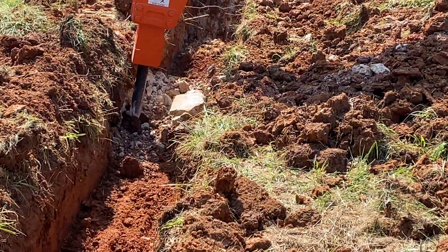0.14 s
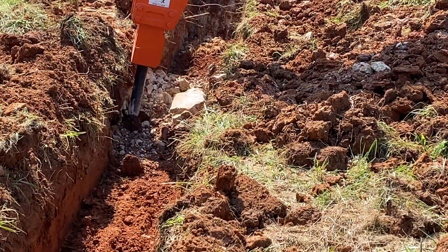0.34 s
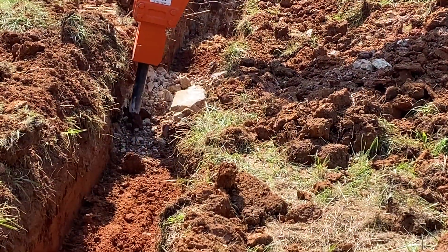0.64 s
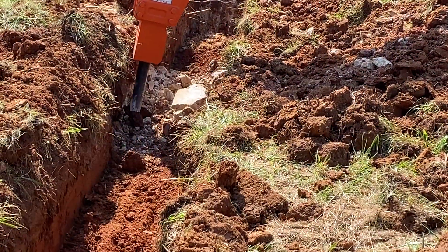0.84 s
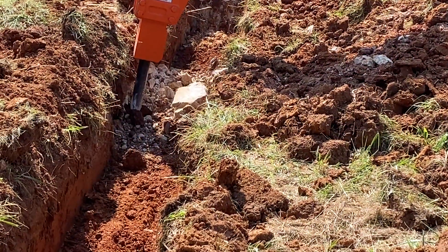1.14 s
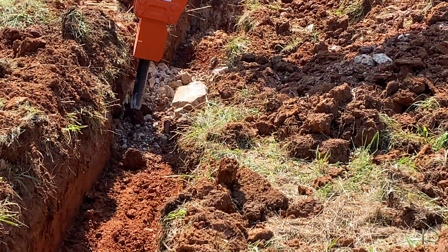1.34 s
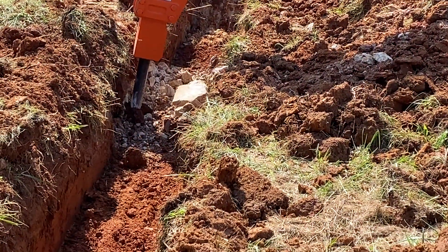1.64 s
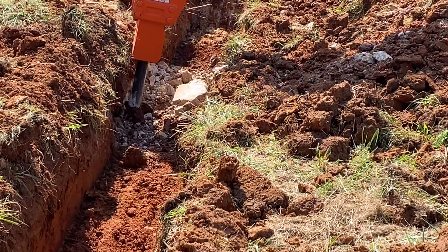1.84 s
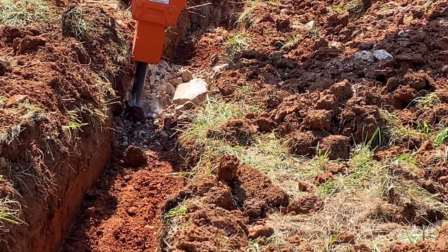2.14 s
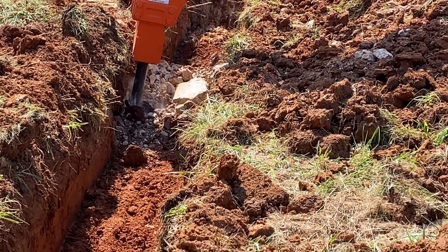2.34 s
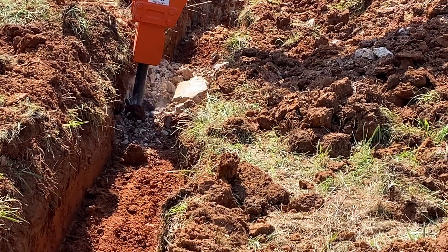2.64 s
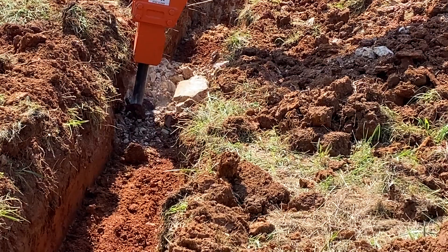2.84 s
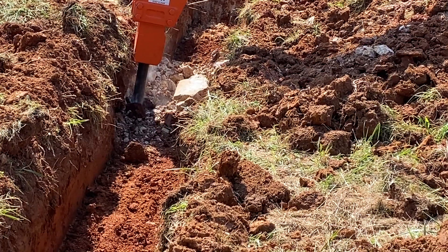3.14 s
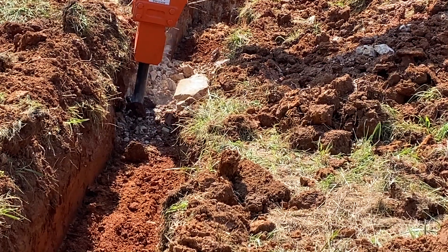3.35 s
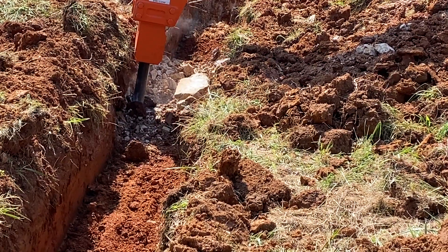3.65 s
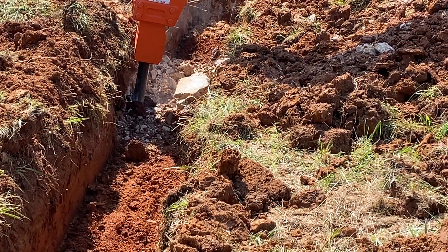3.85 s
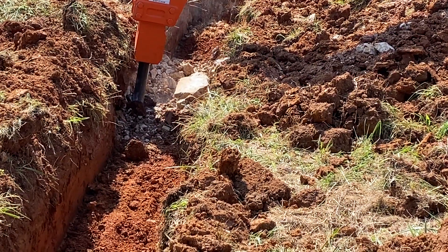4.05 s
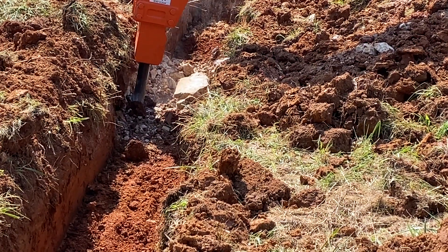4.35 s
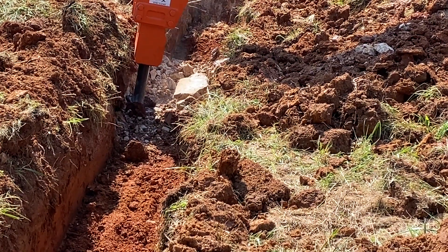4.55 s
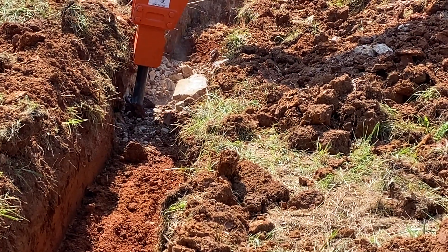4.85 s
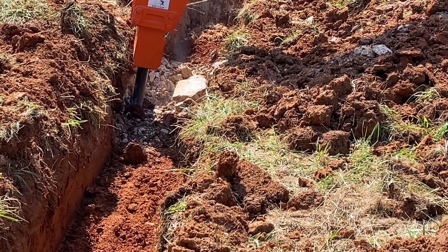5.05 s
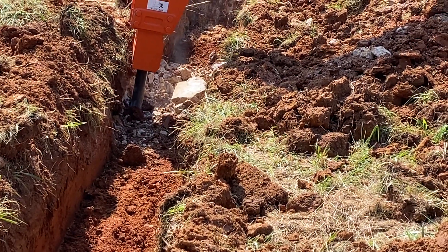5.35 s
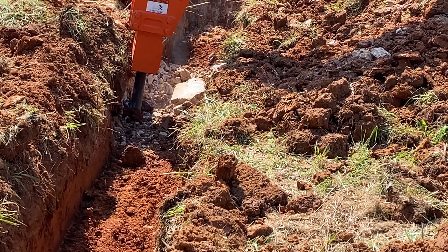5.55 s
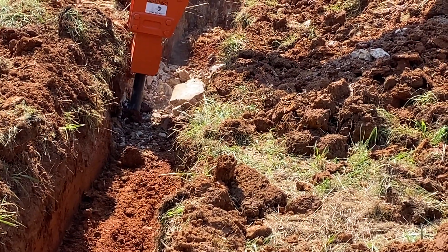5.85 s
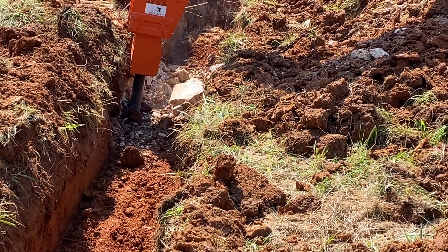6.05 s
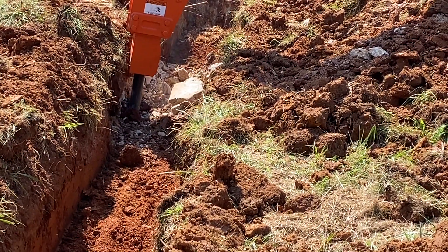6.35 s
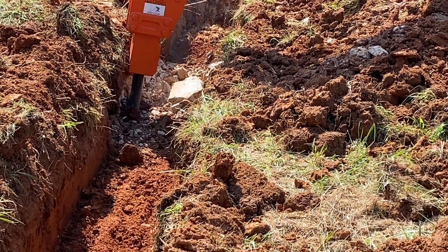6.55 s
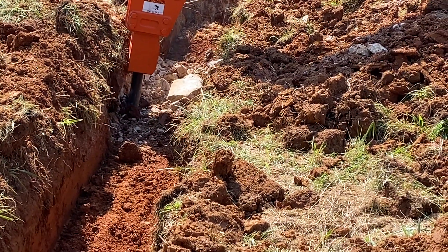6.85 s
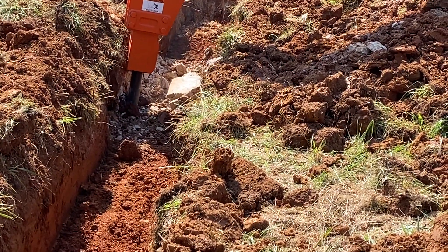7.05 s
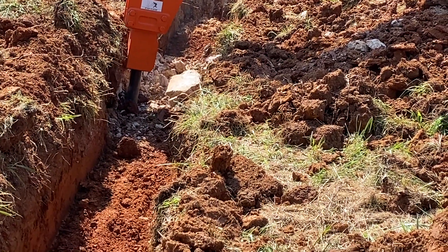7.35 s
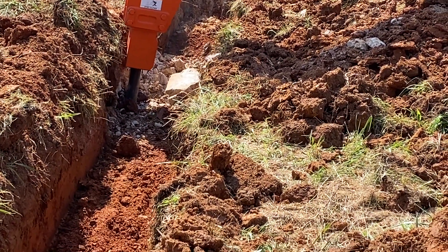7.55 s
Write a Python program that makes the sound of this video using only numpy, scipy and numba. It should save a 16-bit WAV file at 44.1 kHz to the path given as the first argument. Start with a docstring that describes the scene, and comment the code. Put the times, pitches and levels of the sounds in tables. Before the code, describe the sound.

A low diesel drone runs for nearly two seconds, with a light metal clank and rushing oil as the breaker is pressed down. A crunch starts relentless hydraulic hammering: sharp cracks, short steely clangs, small rebounds and rattling chips, first slightly uneven, later faster and even. Short scatter comes from the dirt banks; a handheld recorder's gain control pushes the engine beneath the loud blows until the end.

```python
"""An excavator's diesel and fan run beside a trench, then the chisel knocks in its bushing and oil whistles.
Pushed home, the chisel crunches; the hydraulic hammer pounds the rock, six blows a second, then eight.
Engine and pump are firing-rate tones and coloured noise. Each blow is a noise crack plus decaying steel
modes, with rebounds, rattling grit and scatter off the trench banks. The recorder's gain control pushes
the engine down once the blows begin."""
import sys
import numpy as np
from scipy import signal
from scipy.fft import rfft, irfft, next_fast_len
from scipy.io import wavfile
from scipy.ndimage import uniform_filter1d, minimum_filter1d
from numba import njit

SR = 44100
rng = np.random.default_rng(int(sys.argv[2]) if len(sys.argv) > 2 else 0)


def master(y):
    """Save y as 16-bit WAV."""
    cut = np.clip(np.atleast_2d(y).T, -1, 1)
    pcm = np.round(cut * 32767)  # scale
    wavfile.write(sys.argv[1], SR, pcm.astype(np.int16))


N = 340011
TIME = np.arange(N) / SR
AGE = TIME[:12000]  # seconds since a blow


def undb(db):
    """Decibels to gain."""
    return 10 ** (np.asarray(db) / 20)


def curves(table, times=TIME):
    """The columns of a table, joined by straight lines in time."""
    s, *columns = np.transpose(table)
    return [np.interp(times, s, column) for column in columns]


def at_hz(hz, points):
    """Read (frequency [Hz], value) points on a log-frequency axis."""
    f, value = np.transpose(points)
    return np.interp(np.log(np.maximum(hz, 1)), np.log(f), value)


def colour(white, points):
    """Give unit white noise a spectrum in dB per Hz."""
    size = next_fast_len(white.shape[-1])
    gain = undb(at_hz(np.fft.rfftfreq(size, 1 / SR), points)) * np.sqrt(SR / 2)
    return irfft(rfft(white, size) * gain, size)[..., :white.shape[-1]]


def band_noise(hz, width_hz):
    """Noise through the same resonance twice, rms 1; width_hz is that of one pass."""
    b, a = signal.iirpeak(hz, hz / width_hz, SR)
    once = signal.lfilter(b, a, rng.standard_normal(N))
    twice = signal.lfilter(b, a, once)
    return twice / twice.std()


def walk(rate):
    """Random wander with a spread near 1, joined by straight lines between `rate` points a second."""
    return np.interp(TIME * rate, np.arange(1000), rng.standard_normal(1000))


def ramp(start_s, length_s):
    """An even rise from 0 to 1."""
    return np.clip((TIME - start_s) / length_s, 0, 1)


def fade(t60):
    """Exponential decay after a blow, 60 dB down at t60 seconds."""
    return np.exp(-np.log(1000) * AGE / t60)


def add(track, s, sound):
    """Mix a sound into a track at a time."""
    start = min(int(s * SR), N)
    track[start:start + len(sound)] += sound[:N - start]


# Fan and exhaust noise from the sides: (frequency [Hz], level [dB per Hz])
FAN_SPECTRUM = [(60, -82), (140, -55), (200, -58), (260, -69), (350, -67), (430, -80), (700, -64),
                (1050, -75), (1430, -63.5), (2100, -83.5), (3000, -112)]


def fan():
    """Cooling air and exhaust spread to the sides: one noise, in opposite polarity left and right."""
    return colour(rng.standard_normal(N), FAN_SPECTRUM) * np.array([[1], [-1]])


# The hydraulic load builds as the hammer is pressed onto the rock
PRESS_FROM_S, PRESS_S, IDLE_LOAD = 1.34, 0.51, 0.1


def pump_load():
    """Hydraulic load 0-1: light at first, full once the hammer leans on the rock."""
    return IDLE_LOAD + (1 - IDLE_LOAD) * ramp(PRESS_FROM_S, PRESS_S)


# The firing rate flares briefly as the hammer changes stroke
FIRING_HZ, FLARE_HZ, FLARE_AT_S, FLARE_S = 67.36, 1.77, 4.5, 0.0468
# Exhaust and pump tones, before the engine's level:
# (multiple of firing rate, level [dB], extra level at full load [dB])
ENGINE_TONES = [(1, -18, -5), (2, -23.5, 1), (3, -34.5, -17), (4.25, -42, -3), (5.5, -47.5, 11),
                (6, -62, -3.5), (8, -49, 2), (8.25, -45, -2), (9, -57.5, 13), (10, -45, -0.5),
                (11, -44.5, 9)]
# Exhaust rumble, fan and injector clatter, before the engine's level: (frequency [Hz], level [dB per Hz])
RUMBLE_SPECTRUM = [(22, -82), (50, -47), (85, -43.5), (112, -50.5), (160, -43.5), (202, -41), (240, -57),
                   (350, -57), (440, -69), (740, -64.5), (1900, -79), (2700, -74), (6000, -86.5),
                   (15500, -98)]
# Engine level over time: (time [s], level [dB])
ENGINE_LEVEL = [(.4, -1), (1, 1), (1.88, 8), (2.05, 1.5), (4, 2.5), (5, 2), (6, 5), (7.7, 3.3)]


def engine(pulsing=0.11):
    """Four cylinders sound the exhaust and drive the pump; gas and clatter pulse with every firing."""
    flutter_db, wander = .5, .001  # wander is a fraction of the firing rate
    hz = FIRING_HZ + FLARE_HZ * np.exp(-((TIME - FLARE_AT_S) / FLARE_S) ** 2)
    level_db, = curves(ENGINE_LEVEL)
    load = pump_load()
    phase = 2 * np.pi * np.cumsum(hz * (1 + wander * walk(12))) / SR
    tones = 0
    for multiple, db, extra_db in ENGINE_TONES:
        gain = np.sqrt(2) * undb(db + extra_db * load + flutter_db * walk(5.1))
        tones = tones + gain * np.sin(multiple * phase + rng.uniform(0, 2 * np.pi))
    puffs = rng.standard_normal(N) * (1 + pulsing * np.cos(phase))
    rumble = colour(puffs, RUMBLE_SPECTRUM) * undb(0.69 * walk(4.4))
    return undb(level_db) * (tones + rumble)


def pump(growl_db=-44, growl_hz=820, width_hz=700):
    """The hydraulic pump growls as the pressure builds: band noise scaled by the load."""
    return pump_load() * undb(growl_db + 3.0 * walk(4.9)) * band_noise(growl_hz, width_hz)


VALVE_RANGE_DB = 28  # from shut to open
# The oil valve opens; levels are before the opening curve:
# (start [s], attack [s], hold [s], release [s], whistle [Hz], whistle level [dB], rush level [dB])
OIL_OPENINGS = [(.48, 0.048, 0.52, .12, 10200, -57, -56), (1.546, .21, 0.022, 0.17, 5450, -38, -37)]


def valve(whistle_width_hz=350):
    """Oil whistles and rushes through the valve: narrow and broad noise follow its opening."""
    out = 0
    for s, attack_s, hold_s, release_s, hz, whistle_db, rush_db in OIL_OPENINGS:
        opening = ramp(s, attack_s) - ramp(s + attack_s + hold_s, release_s)
        # subtract the shut gain, so a shut valve is silent
        flow = undb(VALVE_RANGE_DB * (opening - 1)) - undb(-VALVE_RANGE_DB)
        whistle = undb(whistle_db + 5.3 * walk(30.3)) * band_noise(hz, whistle_width_hz)
        rush = undb(rush_db) * band_noise(5400, 5500)
        out = out + flow * (whistle + rush)
    return out


def near_bank(x, echo_db=-15.0, low_hz=600, high_hz=1500):
    """The bank beside the microphone returns the midrange late, added left and subtracted right."""
    late = np.pad(x, (150, 0))[:N]  # 3.4 ms
    echo = signal.sosfilt(signal.butter(4, low_hz, "high", fs=SR, output="sos"), late)
    echo = signal.lfilter(*signal.butter(1, high_hz, fs=SR), echo)
    return undb(echo_db) * echo * np.array([[1], [-1]])


def trench(x, echo_db=-12, wide_db=-7, t60_s=0.08, dull_hz=4000, wide_hz=1600):
    """Earth banks and the machine scatter the blows back; mainly the lower echoes differ left and right."""
    far_s = .045  # scatter swells until here, then decays
    shape = np.minimum(AGE / far_s, undb(-60 * (AGE - far_s) / t60_s))
    mid, side = rng.standard_normal((2, len(AGE))) * shape / np.sqrt(np.sum(shape ** 2))
    mid = signal.lfilter(*signal.butter(1, dull_hz, fs=SR), mid)
    side = undb(wide_db) * signal.lfilter(*signal.butter(1, wide_hz, fs=SR), side)
    response = np.array([mid + side, mid - side])
    echoes = signal.fftconvolve(x[None], response, axes=1)[:, :N]
    return x + undb(echo_db) * echoes


def ring(modes, phases, scatter_db=1.5, detune=0.0052, slip=0.28, swell_s=0.0017,
         swell_cycles=2.53, sustain=1):
    """Steel modes swell over a few cycles and die away, never twice quite alike."""
    hz, db, t60 = np.transpose(modes)[:, :, None]
    size, pitch, shift, damping = rng.standard_normal((4, len(modes), 1))
    # pressed against the rock, modes are held to about 250 cycles
    t60 = sustain * np.minimum(t60, 250 / hz) * np.exp(.15 * damping)
    swell = 1 - np.exp(-AGE / (swell_s + swell_cycles / hz))
    waves = np.sin(2 * np.pi * hz * (1 + detune * pitch) * AGE + phases + slip * shift)
    return np.sum(undb(db + scatter_db * size) * swell * fade(t60) * waves, axis=0)


# Crack of steel on rock, before shaping and mixing: (frequency [Hz], level [dB per Hz])
CRACK_SPECTRUM = [(35, -69), (80, -44), (200, -43), (400, -59), (700, -51), (1200, -53.5), (2100, -50),
                  (3200, -55.5), (4100, -59.5), (6200, -57.5), (8300, -59.5), (12000, -68), (15500, -72.5)]


def cracks(count, likeness=0.84, t60_slope=0.15, build_cycles=0.21, snap_db=5, snap_s=0.0022,
           sweep_s=0.002998):
    """The chisel chatters on the rock: octave bands of noise, alike from blow to blow as likeness sets."""
    contact_s, t60_s = .008, .06  # at 1 kHz; other octaves are stretched
    contact = rng.standard_normal((count, len(AGE)))
    for k in range(1, count):
        contact[k] = likeness * contact[k - 1] + np.sqrt(1 - likeness ** 2) * contact[k]
    spectrum = rfft(colour(contact, CRACK_SPECTRUM))
    octave = np.log2(np.clip(np.fft.rfftfreq(len(AGE), 1 / SR), 62.5, 16000) / 1000)
    # bending waves run slower the lower they are, so each crack sweeps downwards
    lag_s = sweep_s * np.maximum(0, 2 ** (-np.maximum(octave, -1) / 2) - 1 / 2)
    sweep = np.exp(-2j * np.pi * np.cumsum(lag_s) * SR / len(AGE))
    out = 0
    for k in range(-4, 5):  # octaves from 1 kHz
        hz = 1000 * 2. ** k
        # lows come late and stay, highs snap and go
        stretch = 2 ** (-k * t60_slope)
        build = 1 - np.exp(-AGE * hz / build_cycles)
        decay = np.minimum(1, undb(-60 * (AGE - contact_s * stretch) / (t60_s * stretch)))
        # the first touch of the steel snaps brightest
        snap = undb(snap_db * np.clip((k + 1) / 3, 0, 1) * np.exp(-(AGE / snap_s) ** 2))
        band = irfft(spectrum * np.maximum(0, 1 - abs(octave - k)), len(AGE))
        out = out + build * decay * snap * band
    return irfft(rfft(out) * sweep, len(AGE))


# Shaken grit and rattling plates, before shaping and mixing: (frequency [Hz], level [dB per Hz])
GRIT_SPECTRUM = [(100, -60.5), (400, -52), (600, -42.5), (1000, -59), (1600, -55.5), (3000, -69.5),
                 (4700, -63), (5350, -63.5), (6100, -68), (8500, -70), (15500, -86.5)]


def grit(settle_s=0.038, t60_s=0.37, early_db=-5):
    """Chips and plates rattle most around the hammer's drop back from recoil, then settle: clumpy noise."""
    recoil_s, clump_db = .045, 3
    # uneven gains over short time-frequency cells make brief ticks at different pitches
    _, _, chips = signal.stft(rng.standard_normal(len(AGE)), nperseg=256)
    uneven = chips * undb(clump_db * rng.standard_normal(chips.shape))
    rattle = signal.istft(uneven)[1][:len(AGE)]
    rise = undb(np.interp(AGE, [0, recoil_s / 2, recoil_s], [-20, early_db, 0]))
    settle = np.minimum(1, undb(-60 * (AGE - settle_s) / t60_s))
    # the debris falls in uneven bursts
    burst_s, burst_db = .012, 1.5
    bursts = undb(burst_db * np.interp(AGE / burst_s, np.arange(24), rng.standard_normal(24)))
    return rise * settle * bursts * colour(rattle / rattle.std(), GRIT_SPECTRUM)


# Ringing modes of the chisel's bushing, before knock level, cap and scatter:
# (frequency [Hz], level [dB], t60 [s])
BUSHING_MODES = [(523, -10, 0.066), (740, -13, 0.092), (1077, -10.5, 0.057), (1417, -12, 0.09),
                 (1663, -22, 0.19), (2495, -11.5, 0.056), (2960, -23, 0.025), (4430, -23, 0.074),
                 (5840, -21, 0.048)]
# The loose chisel knocks and crunches; gains on each sound: (time [s], knock [dB], crunch of rock [dB])
CHISEL_CLANKS = [(.278, -7.5, -11.5), (1.8133, 8.5, 10.5), (1.843, 1, 0.5)]


def clanks(low_hz=600, dull_hz=4500):
    """The chisel knocks in its bushing as it is set down, and crunches into the rock when pushed home."""
    track = np.zeros(N)
    contacts = cracks(len(CHISEL_CLANKS), likeness=0.077)
    for (s, knock_db, crunch_db), crack in zip(CHISEL_CLANKS, contacts):
        phases = rng.uniform(0, 2 * np.pi, (len(BUSHING_MODES), 1))
        knock = ring(BUSHING_MODES, phases, swell_s=0.00023)
        crunch = signal.lfilter(*signal.butter(1, [low_hz, dull_hz], "band", fs=SR), crack + grit())
        add(track, s, undb(knock_db) * knock + undb(crunch_db) * crunch)
    return track


# The even stroke lengthens a little with every blow
EVEN_FROM_S, STROKE_S, SLOWING_S_PER_BLOW = 4.5459, .12057, .000082
# The hammer starts on long, uneven strokes: (time [s])
LONG_STROKE_TIMES = [1.9232, 2.0702, 2.2275, 2.397, 2.5735, 2.7503, 2.926, 3.1, 3.2726, 3.4451, 3.615,
                     3.7888, 3.9601, 4.12, 4.263, 4.4147]


def blow_times(count=26):
    """The long opening strokes, then the even run."""
    strokes = STROKE_S + SLOWING_S_PER_BLOW * np.arange(count)
    even_run = EVEN_FROM_S + np.cumsum(np.append(0, strokes))
    return np.concatenate([LONG_STROKE_TIMES, even_run])


def seat_tone(hz, knock_db, clang_db, ring_db, treble_db, thud_follow=0.76, thud_db=-1,
              mid_follow=0.48, low_ring_follow=0.76, high_ring_follow=1.17):
    """Tone curve in dB: a buried chisel rings less and thuds more into the ground."""
    ground_db = thud_db - thud_follow * ring_db
    mid_db = mid_follow * (knock_db - ring_db)
    low_ring_db, high_ring_db = low_ring_follow * ring_db, high_ring_follow * ring_db
    half_clang_db = clang_db / 2
    return at_hz(hz, [
        (250, ground_db), (740, knock_db), (1500, mid_db), (2150, clang_db),
        (2290, low_ring_db + half_clang_db), (2360, low_ring_db + half_clang_db),
        (2600, half_clang_db), (2850, half_clang_db), (3400, low_ring_db),
        (4200, half_clang_db), (5100, half_clang_db), (5800, high_ring_db),
        (6400, high_ring_db), (7500, half_clang_db), (10000, treble_db)])


# A longer stroke hits harder
FORCE_DB_PER_DOUBLING = 0.5
# Treble of the tone curve dulls as the chisel sinks into crushed rock, until the even run
FRESH_TREBLE_DB, DULLING_DB_PER_S = 7.5, 4.5
# Random spread of the seating values from blow to blow
COLOUR_SPREAD_DB, GRIT_SPREAD_DB = 0.63, 1.42
# The piston's control valve ticks just before each blow; level relative to the crack
TICK_LEAD_S, TICK_DB = .0072, -18
# A buried chisel stops ringing sooner: dB of ring time per dB of chisel ring
RING_TIME_FOLLOW = 0.16
# Ringing modes of chisel and housing, before seating, cap and scatter:
# (frequency [Hz], level [dB], t60 [s])
STEEL_MODES = [(533.2, -22.5, 0.19), (637.4, -17.5, 0.11), (756, -11.5, 0.074), (828, -18.5, 0.063),
               (1013, -33, 0.35), (1078, -30, 0.23), (1191, -30.5, 0.17), (1395, -26, 0.099),
               (1452, -29.5, 0.2), (1591, -24.5, 0.1), (1711, -19.5, 0.06), (1823, -25.5, 0.17),
               (2140, -4, 0.016), (2149, -10.5, 0.04), (2318, -16.5, 0.088), (2840, -17, 0.028),
               (3330, -15.5, 0.062), (3404, -18.5, 0.062), (4240, -29, 0.065), (4715, -25, 0.069),
               (5083, -16, 0.13), (5360, -20.5, 0.043), (5870, -10, 0.028), (6315, -13.5, 0.044),
               (7674, -18.5, 0.048), (9710, -20, 0.049), (10670, -37, 0.033), (15200, -43, 0.027)]
# How the chisel sits as it works into the rock, before spread and the follow factors:
# (time [s], body knock [dB], housing clang [dB], chisel ring [dB], loose grit [dB])
CHISEL_SEATING = [(1.92, -9.5, -8, 0, -5), (2.2, -3, -1, 3, -6.5), (2.62, -2.5, 4, 2.5, 0),
                  (2.95, 0.5, 0, 6, -6.5), (3.4, 6.5, -2, -2.5, -9.5), (3.75, 5, -3, 3.5, -9),
                  (4.2, -1, -2, 3.5, -10), (4.7, 2, -10, 2, -10), (5.2, 0.5, -3.5, -4, -3.5),
                  (5.9, 7, -3, -4, -4.5), (6.65, -3, -8, -4, -6), (7.7, -2, 4, -7.5, -5)]


def hammer(force_db=11, steel_db=1, grit_db=1.0, rebound_db=-19, ring_follow=0.73, crack_follow=0.45):
    """Piston blows: crack, steel ring, rebounds and grit, coloured by how firmly the chisel sits."""
    track, times = np.zeros(N), blow_times()
    rebound_s = .052
    phases = rng.uniform(0, 2 * np.pi, (len(STEEL_MODES), 1))
    hz = np.fft.rfftfreq(len(AGE), 1 / SR)
    strokes = np.diff(times, prepend=times[0] - STROKE_S)
    seating = np.transpose(curves(CHISEL_SEATING, times))
    spread_db = [COLOUR_SPREAD_DB, COLOUR_SPREAD_DB, COLOUR_SPREAD_DB, GRIT_SPREAD_DB]
    seating = seating + rng.standard_normal(seating.shape) * spread_db
    for s, stroke_s, seat, crack in zip(times, strokes, seating, cracks(len(times))):
        knock_db, clang_db, ring_db, loose_db = seat
        treble_db = FRESH_TREBLE_DB - DULLING_DB_PER_S * (min(s, EVEN_FROM_S) - times[0])
        tone_db = seat_tone(hz, knock_db, clang_db, ring_db, treble_db)
        # the seating changes the steel's ring more than the crack
        steel = ring(STEEL_MODES, phases, sustain=undb(RING_TIME_FOLLOW * ring_db))
        crack_part = undb(crack_follow * tone_db) * rfft(crack)
        steel_part = undb(steel_db + ring_follow * tone_db) * rfft(steel)
        blow = irfft(crack_part + steel_part, len(AGE))
        blow = blow * undb(FORCE_DB_PER_DOUBLING * np.log2(stroke_s / STROKE_S))
        add(track, s - TICK_LEAD_S, undb(TICK_DB) * crack)
        add(track, s, blow)
        add(track, s, undb(grit_db + loose_db) * grit())
        # the hammer drops back on the chisel in a few dull bounces
        bounce = signal.lfilter(*signal.butter(2, [800, 3000], "band", fs=SR), blow)
        for late, size in rng.standard_normal((3, 2)):
            bounce_at = s + rebound_s * np.exp(.22 * late)
            add(track, bounce_at, undb(rebound_db + loose_db + 2 * size) * bounce)
    return undb(force_db) * track


def scene():
    """Hammer in the trench, engine, pump, valve and fan behind it."""
    background = fan() + engine() + pump() + valve()
    strikes = hammer() + clanks()
    return background + near_bank(strikes) + trench(strikes)


@njit
def follow(x, attack, release):
    """Envelope with separate smoothing for rise and fall, as fractions per sample."""
    out, e = np.empty(len(x)), 0.
    for i in range(len(x)):
        e += (x[i] - e) * (attack if x[i] > e else release)
        out[i] = e
    return out


TOP_HZ = 15800  # where the recorder cuts off
# Phase between the two microphone ports: (frequency [Hz], left lead [radians])
PORT_LEAD = [(0, 0), (150, -.33), (330, -.25), (430, -.1), (600, -.42), (950, 0), (7300, 0), (7650, -.55),
             (8000, -1.2), (8450, -2.6), (8900, -3.14), (15500, -12.57), (22050, -12.57)]
# Balance between the two microphone ports: (frequency [Hz], left minus right [dB])
PORT_TILT = [(200, 0), (430, 0), (700, -3.8), (1290, -2), (2400, -.2), (4400, 0)]


def record(dry, knee_db=-13, attack_s=0.058, release_s=1.0, recover_s=0.00067):
    """Two ports, a slow gain control, a quick peak limiter and a steep cut at the top."""
    ceiling_db = -1
    size = next_fast_len(N)
    hz = np.fft.rfftfreq(size, 1 / SR)
    # each port takes half of the balance and phase
    half_lead = np.exp(.5j * np.interp(hz, *np.transpose(PORT_LEAD)))
    ports = undb(at_hz(hz, PORT_TILT) / 2) * half_lead
    x = irfft(rfft(dry, size) * np.array([ports, 1 / ports]), size)[:, :N]
    loudness = follow(abs(x).max(axis=0), 1 / (attack_s * SR), 1 / (release_s * SR))
    x = x / np.maximum(1, loudness / undb(knee_db))
    # hold each peak over 41 samples so the limiter acts ahead of it
    held = -minimum_filter1d(-abs(x).max(axis=0), size=41)
    peaks = follow(held, 0.25, 1 / (recover_s * SR))
    x = x / uniform_filter1d(np.maximum(1, peaks / undb(ceiling_db)), size=41)
    return signal.sosfilt(signal.ellip(8, .2, 70, TOP_HZ, fs=SR, output="sos"), x)


dry = scene()
out = record(dry)
master(out)
```